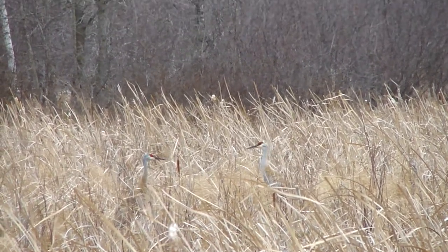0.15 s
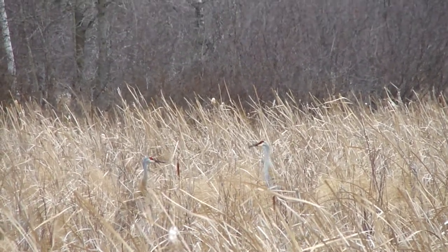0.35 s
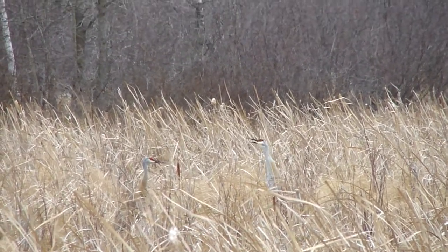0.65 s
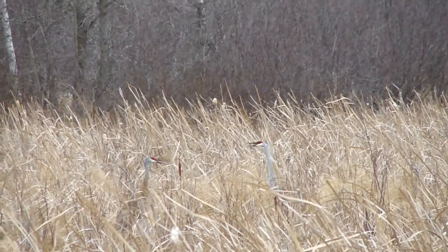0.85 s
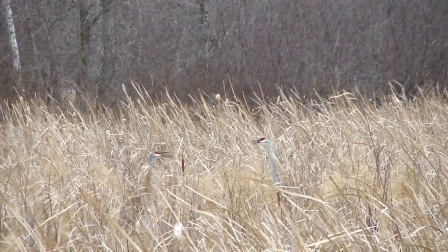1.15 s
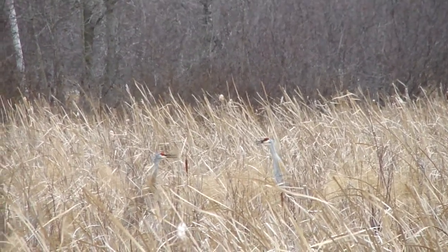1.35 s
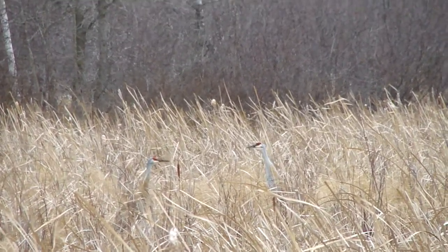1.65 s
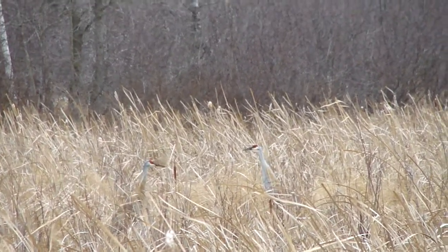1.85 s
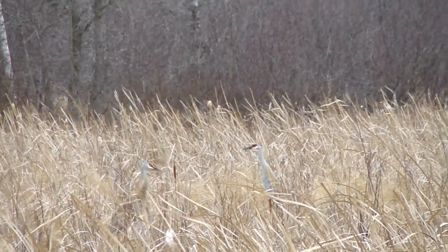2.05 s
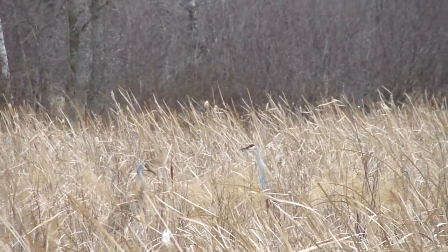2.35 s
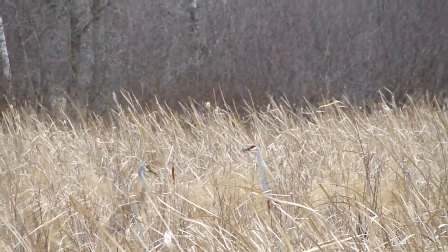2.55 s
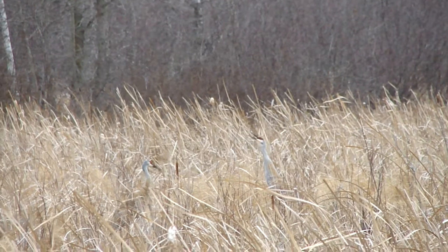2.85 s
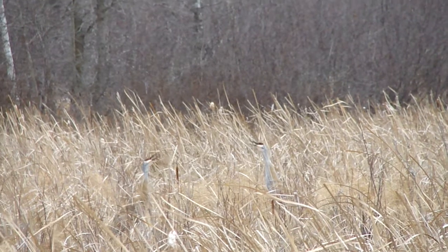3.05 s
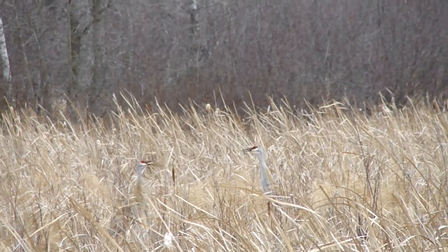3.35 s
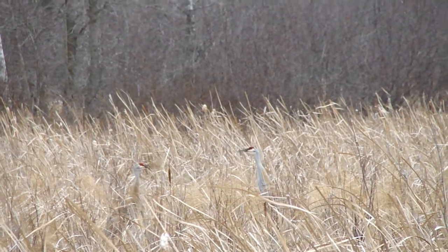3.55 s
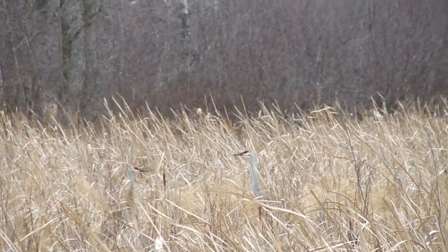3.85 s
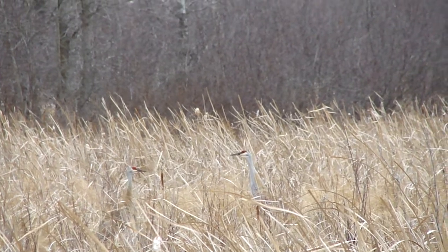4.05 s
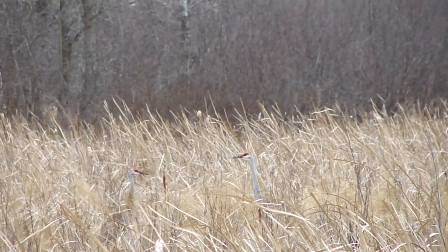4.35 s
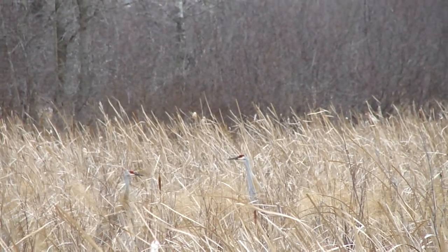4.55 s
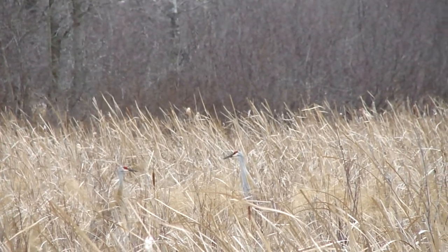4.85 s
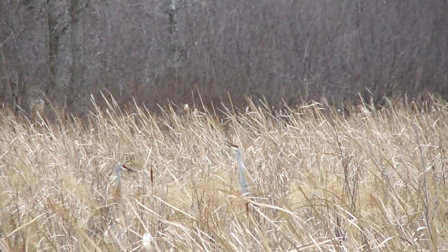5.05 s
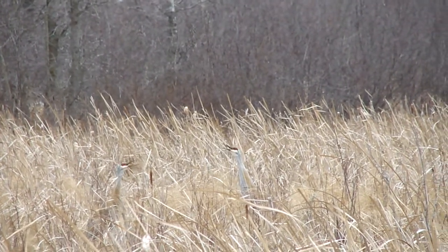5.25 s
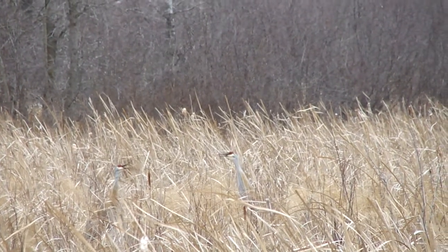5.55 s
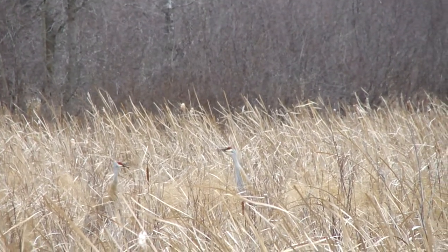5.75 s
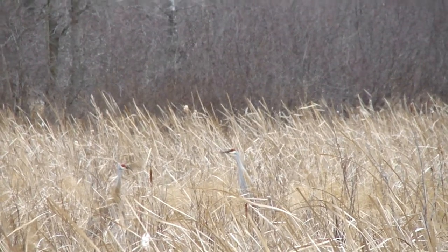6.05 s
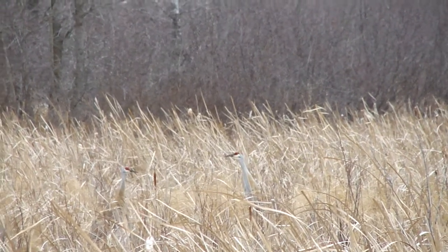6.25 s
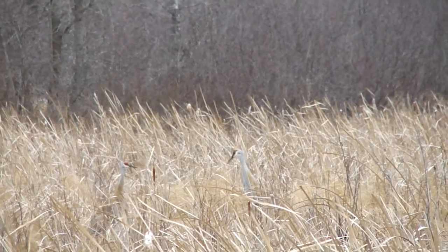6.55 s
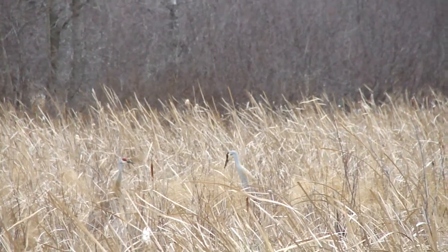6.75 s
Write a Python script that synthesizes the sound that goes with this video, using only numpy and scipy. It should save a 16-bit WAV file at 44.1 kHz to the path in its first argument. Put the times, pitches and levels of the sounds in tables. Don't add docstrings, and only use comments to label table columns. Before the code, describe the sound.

Outdoors in a marsh, a quiet wash of far traffic and air. Two cranes call in three duets about two seconds apart: a short swelling honk leads into a hard, throaty roll of knocks, the lower bird first, the higher overlapping it. The calls ring off reeds and trees. Between the first two, small birds chip and a thin buzzing trill runs. A small microphone, with slight casing ticks.

```python
import sys
import numpy as np
from scipy import signal
from scipy.fft import rfft, irfft
from scipy.io import wavfile
from scipy.ndimage import uniform_filter1d

SR = 44100
rng = np.random.default_rng(int(sys.argv[2]) if len(sys.argv) > 2 else 0)


def makeup_ratio(level_db):
    decades = np.asarray(level_db, float) / 20
    return 10 ** decades


def put_to_file(sound):
    columns = np.atleast_2d(sound).T
    safe = np.clip(columns, -1, 1)
    whole_steps = np.round(safe * 32767)
    wavfile.write(sys.argv[1], SR, whole_steps.astype(np.int16))


N = 305172
EDGE_HZ = 11000


def evened(x):
    return x / np.sqrt(np.mean(x ** 2) + 1e-20)


def read(points, hz):
    f, value = np.transpose(points)
    return np.interp(np.log(hz + 1), np.log(f + 1), value)


def add(mix, s, sound):
    part = mix[round(s * SR):][:len(sound)]
    part += sound[:len(part)]


def swell(length, rise, fall):
    u = np.linspace(0, 1, int(length * SR))
    shape = u ** rise * (1 - u) ** fall
    return shape / shape.max()


def fuzzy(hz, width):
    r = np.exp(-np.pi * width / SR)
    z = rng.standard_normal(N) + 1j * rng.standard_normal(N)
    z = signal.lfilter([1], np.convolve([1, -r], [1, -r]), z)
    carrier = np.exp(2j * np.pi * hz * np.arange(N) / SR)
    return evened((z * carrier).real)


def wash():
    # (frequency [Hz], density [dB per Hz])
    wash_colour = [(12, -75), (20, -2), (97, -6.5), (394, -3.5), (426, -1), (499, -5.5), (633, 3.5),
                   (868, -5), (1190, -1.5), (1820, -11.5), (2180, -17.5), (2630, -12.5), (4340, -15),
                   (4950, -15.5), (10900, -19.5), (14200, -46), (22000, -120)]
    # (frequency [Hz], width [Hz], level [dB])
    chorus_bands = [(2160, 230, -64.5), (4420, 550, -68.5)]
    frames, hz = N // 256 + 5, np.fft.rfftfreq(1024, 1 / SR)
    a, b, patches = rng.standard_normal((frames, 513, 3)).T
    patches = uniform_filter1d(patches, 10, 0)
    patches = evened(uniform_filter1d(patches, 14, 1))
    patch_db = .7
    z = (a + 1j * b) * makeup_ratio(read(wash_colour, hz)[:, None] + patch_db * patches)
    steady = signal.istft(z, nperseg=1024, noverlap=768)[1][:N]
    chorus = sum(makeup_ratio(db) * fuzzy(f, width) for f, width, db in chorus_bands)
    return makeup_ratio(-53.5) * evened(steady) + chorus


def wavering_tones(notes):
    out = np.zeros(N)
    for s, db, first_hz, last_hz, length in notes:
        shape = swell(length, rise=.9, fall=1.1)
        waver = 1 + .35 * evened(uniform_filter1d(rng.standard_normal(len(shape)), 120))
        pitch_hz = np.linspace(first_hz, last_hz, len(shape))
        tone = np.sin(2 * np.pi * np.cumsum(pitch_hz) / SR)
        add(out, s, makeup_ratio(db + 5) * shape * waver * tone)
    return out


def chips():
    # (time [s], level [dB], first pitch [Hz], last pitch [Hz], length [s])
    chip_notes = [(2.261, -51, 2200, 2750, .011), (2.299, -55, 3200, 3600, .014),
                  (2.298, -65, 5100, 5100, .012), (2.300, -60, 2550, 2500, .03),
                  (2.405, -52, 2250, 2650, .011), (2.425, -59, 2480, 2520, .04),
                  (4.990, -53, 2050, 2650, .016), (.30, -60, 1280, 1220, .07), (1.85, -60, 1450, 1440, .06),
                  (2.02, -61, 1320, 1370, .07), (2.17, -64, 1430, 1430, .06), (2.17, -67, 4230, 4230, .03)]
    return wavering_tones(chip_notes)


def wood(x):
    # (frequency [Hz], t60 [s], level [dB])
    trunk_ring = [(396, 0.92, 4), (650, 2.26, 8), (926, 2.22, -2.5), (1580, 1.82, -4), (2550, 1.07, -3.5),
                  (5200, 0.5, -1.5), (10000, 0.76, -1.5)]
    tail_db, reeds_db, reeds_t60 = -11.5, -10, .044
    size = 3 * SR
    taps = np.zeros(size)
    at = np.arange(30, size - 22, 22)
    taps[at + rng.integers(0, 22, len(at))] = rng.choice([-1., 1.], len(at))
    reeds = taps * makeup_ratio(-60 * np.arange(size) / SR / reeds_t60)
    late = taps * (np.arange(size) > .02 * SR)
    hz, t, z = signal.stft(late, SR, nperseg=256)
    t60, db = (read(np.array(trunk_ring)[:, [0, k]], hz)[:, None] for k in (1, 2))
    tail = signal.istft(z * makeup_ratio(db - 60 * t / t60), SR, nperseg=256)[1][:size]
    echo = makeup_ratio(tail_db) * tail / np.linalg.norm(tail)
    echo += makeup_ratio(reeds_db) * reeds / np.linalg.norm(reeds)
    return signal.fftconvolve(x, echo)[:N]


def turned(x):
    # (time [s], gain above 6 kHz [dB])
    bill_turn = [(.6, -9), (1.1, -7.5), (1.5, -16), (2.8, 2), (3.0, 1), (3.6, -4.5), (5.1, -6), (5.5, 2),
                 (5.904, -5)]
    treble = signal.sosfiltfilt(signal.butter(2, 6000, "high", fs=SR, output="sos"), x)
    gain = makeup_ratio(np.interp(np.arange(N) / SR, *np.transpose(bill_turn)))
    return x + treble * (gain - 1)


def colour(x, points):
    cepstrum = irfft(np.log(makeup_ratio(read(points, np.fft.rfftfreq(4096, 1 / SR)))))
    cepstrum[1:2048] *= 2
    cepstrum[2049:] = 0
    response = irfft(np.exp(rfft(cepstrum)))[:600]
    return signal.fftconvolve(x, response)


def pulses(hz, shape, breath, jitter, dulling, limp=0):
    drift, puff, strength = rng.standard_normal((3, len(hz)))
    turns = np.cumsum(hz * (1 + jitter * uniform_filter1d(drift, 60))) / SR - .5
    order = np.arange(1, int(EDGE_HZ / hz.max()) + 1)[:, None]
    fade = (shape + 1e-9) ** (1 + dulling * np.log(order))
    snaps = -(fade * np.cos(2 * np.pi * order * turns)).sum(0) / np.sqrt(len(order) / 2)
    uneven = makeup_ratio(1.3 * strength[turns.clip(0).round().astype(int)])
    uneven *= 1 - limp * np.cos(np.pi * turns)
    puffs = breath * fade[len(order) // 2] * puff * np.exp(-(turns % 1) / 1.1)
    return uneven * snaps + puffs


def leads():
    # (time [s], length [s], first pitch [Hz], level [dB], stutter [0-1])
    lead_notes = [
        (0.614, 0.059, 517, -37.5, 0.49),
        (1.02, 0.055, 567, -35, 0.62),
        (2.812, 0.049, 505, -34.5, 0.83),
        (3.104, 0.039, 645, -37.5, 0.58),
        (5.097, 0.0285, 501.5, -37.5, 0.76),
        (5.111, 0.047, 533, -33, 0.45),
        (5.340, 0.052, 574.7, -32.5, 0.47),
    ]
    # (frequency [Hz], gain [dB])
    lead_colour = [(250, -35), (480, -6.5), (1100, 0), (1600, 4.5), (2150, -4), (2700, 4), (3200, -0.5),
                   (4800, -5.5), (5400, -4.5), (6400, -15.5), (10900, -20)]
    out = np.zeros(N)
    for s, length, first_hz, db, stutter in lead_notes:
        rise = .0356 + .95 * max(stutter - .56, 0)
        shape = swell(length, rise=.83, fall=.22)
        t = np.arange(len(shape)) / SR
        clump_depth = np.clip(2 * stutter - .5, 0, 1)
        clumps = 1 - clump_depth * (1 - np.exp(-(t * 122 % 1) / .34))
        pitch_hz = first_hz * (1 + rise * (t / t[-1]) ** 1.2)
        pitch_hz *= 1 - .1 * np.exp(-t / .008)
        drive = pulses(pitch_hz, shape, .15 + .4 * stutter, jitter=.05 + .15 * stutter, dulling=.5)
        add(out, s, makeup_ratio(db) * evened(colour(clumps * drive, lead_colour)))
    return out


def crane(knocks, knock_colour, return_colour, length, delay, limp, return_breath, hum_db, close_db):
    out = np.zeros(N)
    for s, db, hz, return_db, return_s, return_hz in knocks:
        start = s - .0012
        back_start, back_db = start + delay, db + return_db

        shape = swell(length, rise=.3, fall=.5)
        knock_hz = hz * np.linspace(.965, 1.03, len(shape))
        knock = pulses(knock_hz, shape, breath=1, jitter=.25, dulling=.35, limp=limp)
        knock = colour(knock, knock_colour)
        add(out, start, makeup_ratio(db) * knock / abs(knock).max())

        shape = swell(.003, rise=.5, fall=.5)
        snap = colour(pulses(hz + 0 * shape, shape, breath=1, jitter=.2, dulling=.6), knock_colour)
        add(out, back_start + return_s - .002, makeup_ratio(back_db + close_db) * snap / abs(snap).max())

        shape = swell(return_s, rise=.55, fall=.9)
        sag_hz = return_hz * np.linspace(1.01, .985, len(shape))
        back = pulses(sag_hz, shape, return_breath, jitter=.23, dulling=.14, limp=.29 * limp)
        back = colour(back, return_colour)
        add(out, back_start, makeup_ratio(back_db) * back / abs(back).max())

        shape = swell(return_s, rise=.17, fall=.61)
        hum = np.sin(2 * np.pi * (return_hz * np.arange(len(shape)) / SR + rng.random()))
        add(out, back_start + .9 * return_s, makeup_ratio(back_db + hum_db) * shape * hum)
    return out


def piped(roll):
    s, db, hz = np.transpose(roll)
    age = s - s[0]
    spent = np.maximum(age - .26, 0)
    return_s = .018 + (.028 - .018) * np.exp(-age / .0808)
    return_db = -14 - 118 * spent - db
    return_hz = np.where(spent > 0, 759, 795)
    return list(zip(s, db, hz, return_db, return_s, return_hz))


def followed(knocks, under_db, length, share):
    return [(s, db, hz, under_db, length, share * hz) for s, db, hz in knocks]


def low_crane():
    # (time [s], peak [dB], pitch [Hz])
    low_rolls = [
        [(0.743, -13.5, 828), (0.819, -10, 859), (0.886, -9.5, 841), (0.947, -10.5, 878), (1.0051, -11, 781),
         (1.059, -14, 815), (1.1084, -13.5, 785)],
        [(2.948, -11, 870), (3.024, -8.5, 869), (3.088, -7, 882), (3.148, -8, 841), (3.2046, -8, 829),
         (3.258, -9, 795), (3.3089, -10, 770)],
        [(5.229, -10, 817), (5.305, -8, 870), (5.37, -9.5, 866), (5.431, -9.5, 865), (5.484, -9.5, 874),
         (5.5388, -11, 807), (5.5904, -10.5, 783), (5.6404, -12.5, 830)],
    ]
    # (time [s], peak [dB], pitch [Hz])
    slips = [(1.0705, -13.5, 618), (1.162, -29, 820), (2.8148, -27, 457), (2.859, -16, 746),
             (3.364, -30, 795), (5.0995, -33, 495), (5.6005, -20, 740), (5.652, -24, 690)]
    # (level under the knock [dB], length [s], share of the knock's pitch)
    slip_return = (-3.5, .0095, 0.99)
    # (frequency [Hz], gain [dB])
    low_knock_colour = [(350, -16.5), (680, -17), (900, 2.5), (1650, 7.5), (2100, -11), (2700, 8.5),
                        (3400, 2.5), (4000, 1), (4600, 4), (5200, 8), (5900, 2.5), (7000, -4), (10900, -19)]
    # (frequency [Hz], gain [dB])
    low_return_colour = [(350, -64.5), (700, -6.5), (800, -10.5), (1200, -10), (1600, -3), (2400, -14.5),
                         (3200, -12.5), (4000, -14), (4800, -13), (5600, -12.5), (6500, -27.5),
                         (10900, -31.5)]
    knocks = followed(slips, *slip_return)
    for roll in low_rolls:
        knocks += piped(roll)
    return crane(knocks, low_knock_colour, low_return_colour, length=.0064, delay=.0035,
                 limp=.32, return_breath=.9, hum_db=-16.5, close_db=-10)


def murmurs():
    # (time [s], level [dB], first pitch [Hz], last pitch [Hz], length [s])
    murmur_notes = [
        (1.09, -51, 640, 560, .05),
        (1.15, -52, 500, 450, .05),
        (3.27, -50, 580, 500, .06),
        (3.33, -56, 420, 360, .05),
        (5.66, -53, 520, 420, .06),
    ]
    return wavering_tones(murmur_notes)


def high_crane():
    # (time [s], peak [dB], pitch [Hz])
    high_knocks = [(1.15, -10.5, 1010), (1.213, -11, 992), (1.27, -11, 1046), (1.321, -12, 989),
                   (1.371, -12, 968), (1.418, -16.5, 882), (1.466, -31, 934), (3.211, -11.5, 1004),
                   (3.272, -9, 1060), (3.325, -10, 1040), (3.376, -10, 1000), (3.425, -10, 1014),
                   (3.475, -11, 973), (3.521, -13, 961), (3.566, -14.5, 914), (5.458, -12, 1015),
                   (5.521, -9, 1000), (5.575, -9.5, 1034), (5.627, -10, 987), (5.678, -10.5, 1000),
                   (5.726, -12, 957), (5.773, -15, 865), (5.82, -17.5, 874)]
    # (level under the knock [dB], length [s], share of the knock's pitch)
    high_return = (-13.5, .0085, .94)
    # (frequency [Hz], gain [dB])
    high_knock_colour = [(400, -30), (750, -8), (990, 2.5), (1250, -10), (2000, -7), (3000, -8),
                         (4000, -14.5), (5000, -6.5), (6000, -14), (7500, -20), (10900, -25)]
    # (frequency [Hz], gain [dB])
    high_return_colour = [(400, -34.5), (800, 17), (980, -1.5), (1640, 5.5), (3090, -2), (4990, -13),
                          (6540, -48), (10900, -40)]
    return crane(followed(high_knocks, *high_return), high_knock_colour, high_return_colour,
                 length=.0078, delay=.008, limp=.18, return_breath=1, hum_db=-10, close_db=2)


def handling():
    # (time [s], level [dB], frequency [Hz])
    bumps = [(1.239, -56.5, 134.7), (5.37, -62, 60), (5.432, -59, 67.5)]
    # (time [s], peak [dB])
    ticks = [(1.697, -37), (6.803, -39)]
    # (frequency [Hz], level [dB], t60 [s])
    casing_modes = [(3050, 0, 0.035), (4340, 3, 0.015), (5900, 1, .015)]
    out, t = np.zeros(N), np.arange(2600) / SR
    for s, db, hz in bumps:
        bump = np.sin(2 * np.pi * hz * t) * np.exp(-((t - .02) / .013) ** 2)
        add(out, s - .02, makeup_ratio(db) * bump)
    tick = sum(makeup_ratio(db - 60 * t / t60) * np.sin(2 * np.pi * hz * t) for hz, db, t60 in casing_modes)
    for s, db in ticks:
        add(out, s, makeup_ratio(db) * tick / abs(tick).max())
    return out


def trill():
    # (frequency [Hz], width [Hz], level [dB], throb depth [0-1])
    trill_bands = [(3160, 60, -2, .65), (2580, 260, -2, .2), (2850, 260, -4, .2), (3500, 900, -3, .2),
                   (4800, 60, -8, .4)]
    t = np.arange(N) / SR
    throb = np.cos(2 * np.pi * 30.9 * (t - 2.557))
    buzz = np.zeros(N)
    for hz, width, db, depth in trill_bands:
        steady = 200 * depth / width * np.sin(2 * np.pi * hz * t)
        band = (fuzzy(hz, width) + steady) / (1 + 150 * depth / width)
        entry = np.clip(1 - depth + (t - 2.41) / .03, 1 - depth, 1)
        buzz += makeup_ratio(db) * (1 + depth * throb) * band * entry
    start_s, attack_s, hold_s, release_s = 2.28, .018, .67, .1
    corners_s = np.cumsum([start_s, attack_s, hold_s, release_s])
    return makeup_ratio(-58 + np.interp(t, corners_s, [-21, 2, .5, -35])) * buzz


def scene():
    calls = turned(leads() + low_crane() + high_crane())
    calls += chips() + murmurs() + trill()
    return (wash() + calls + wood(calls) + handling())[None]


def roll_off(x):
    return signal.sosfilt(signal.butter(12, 11060, fs=SR, output="sos"), x)


def record(dry):
    thin = signal.sosfilt(signal.butter(2, 58, "high", fs=SR, output="sos"), dry)
    band_limit = signal.firwin(201, EDGE_HZ, window=("kaiser", 6), fs=SR)
    limited = signal.oaconvolve(thin, band_limit[None], "same")
    return roll_off(limited)


dry = scene()
out = record(dry)
put_to_file(out)
```